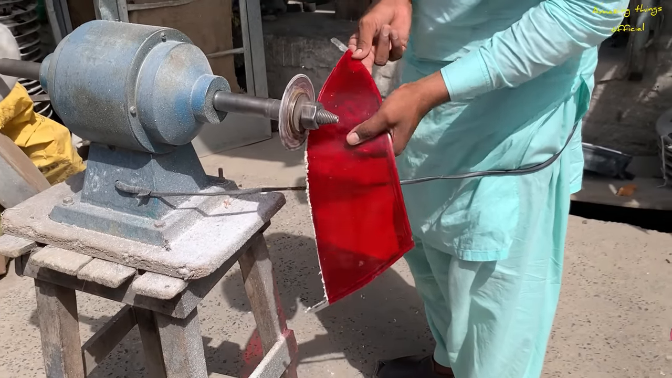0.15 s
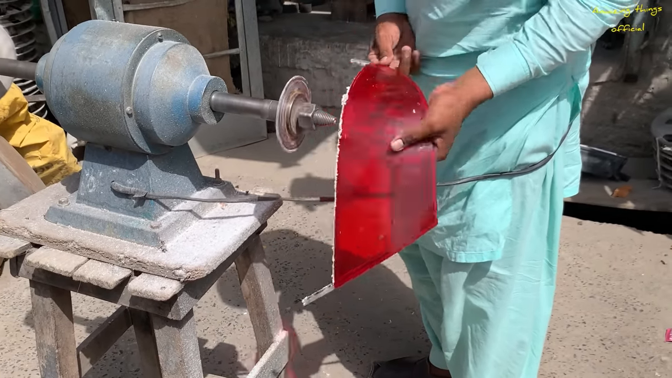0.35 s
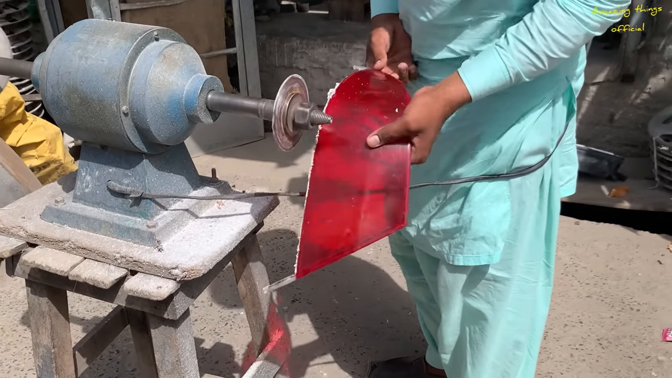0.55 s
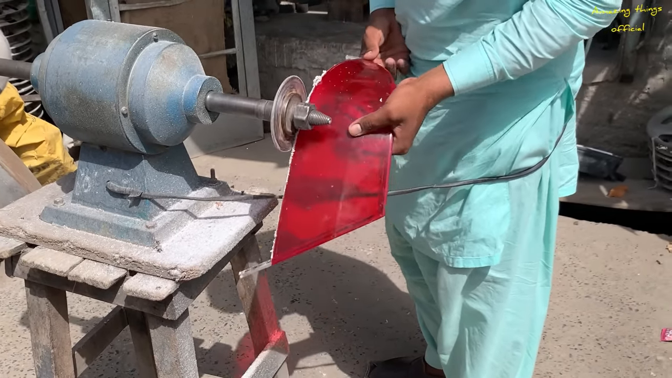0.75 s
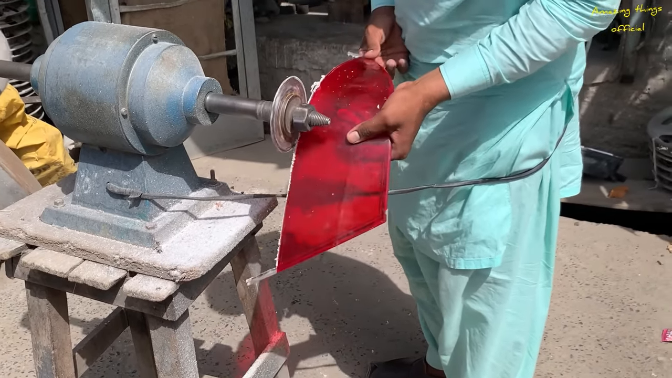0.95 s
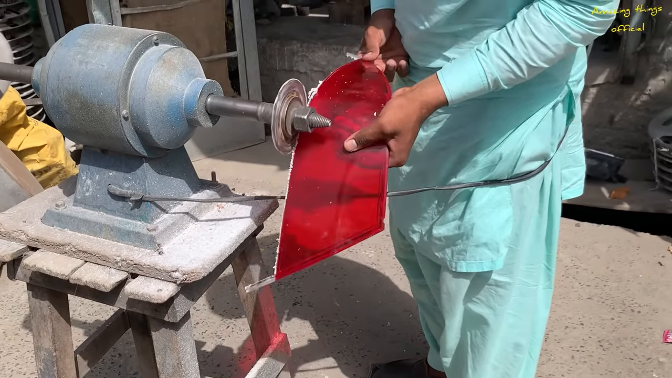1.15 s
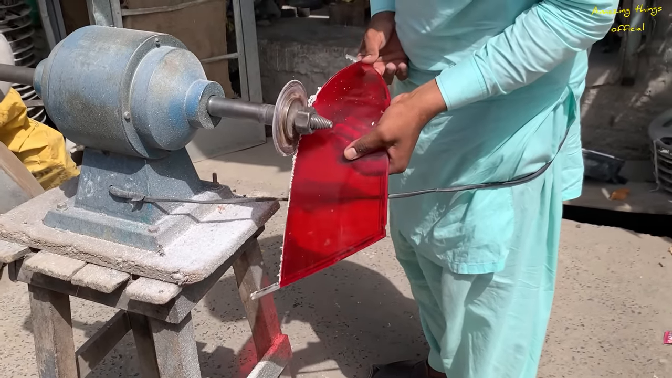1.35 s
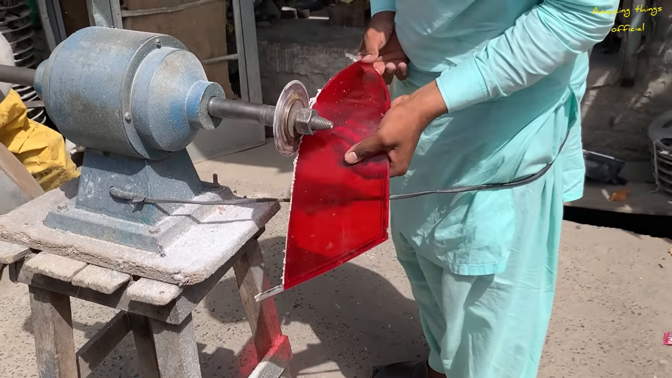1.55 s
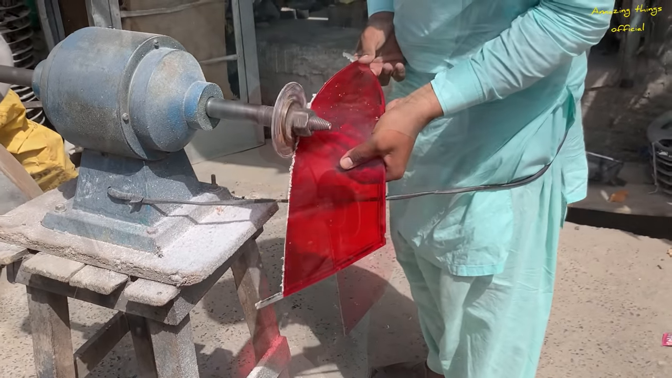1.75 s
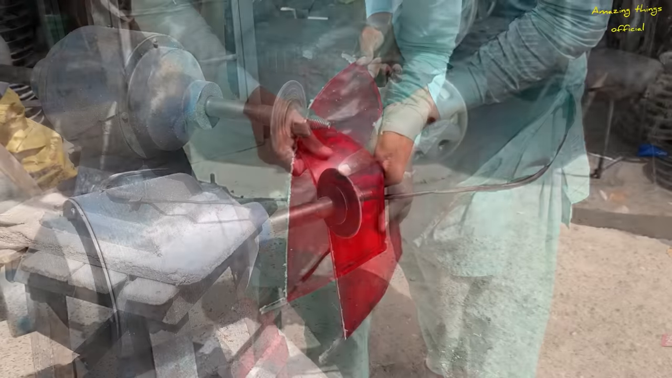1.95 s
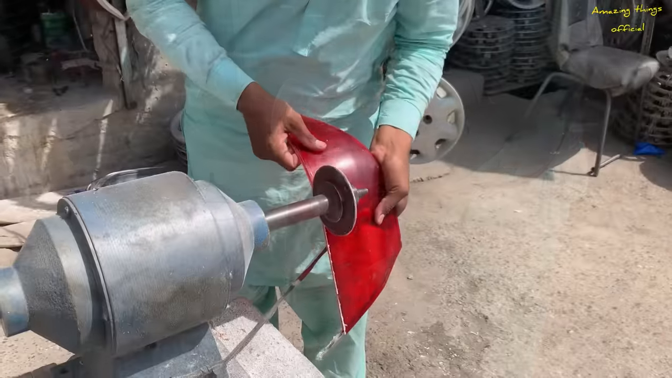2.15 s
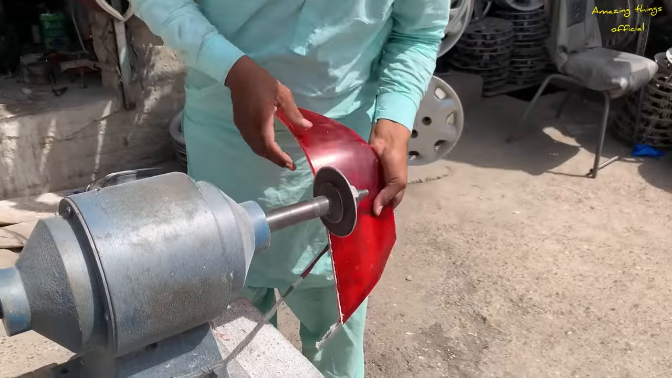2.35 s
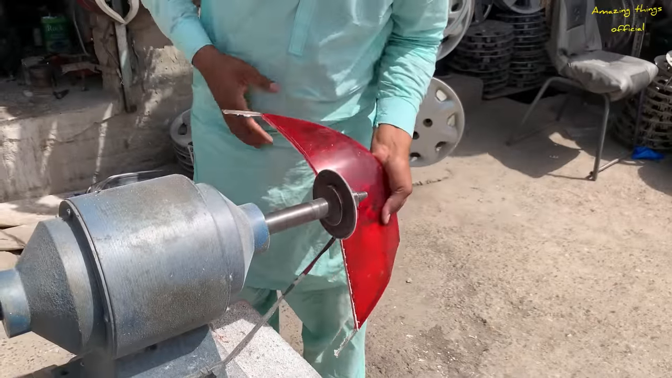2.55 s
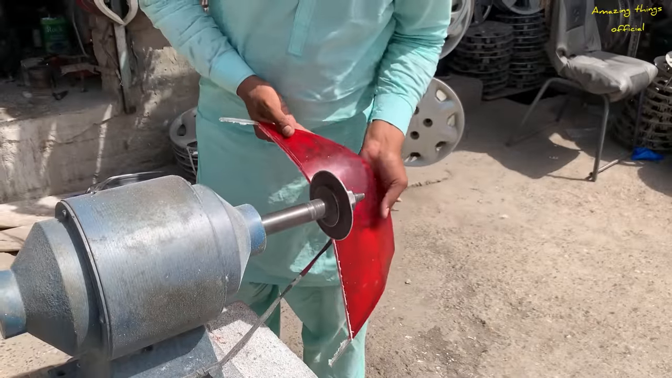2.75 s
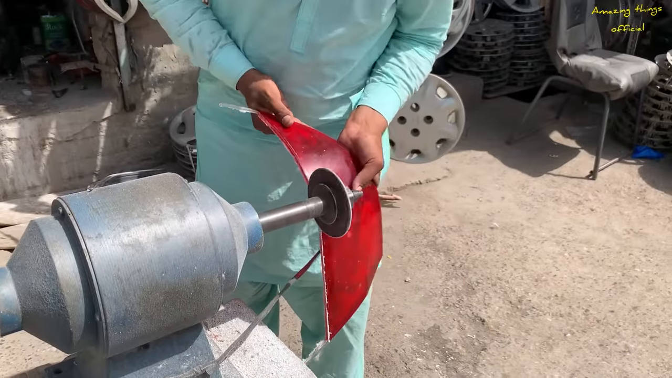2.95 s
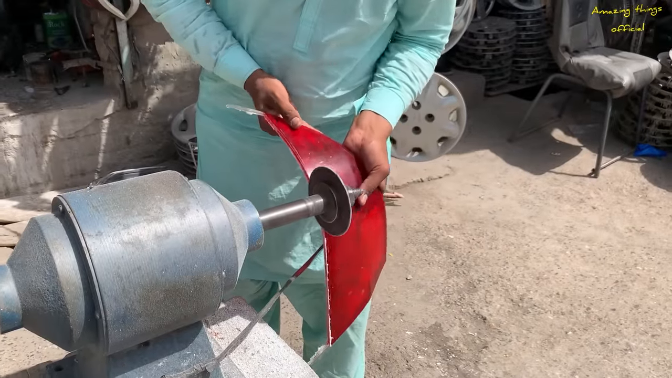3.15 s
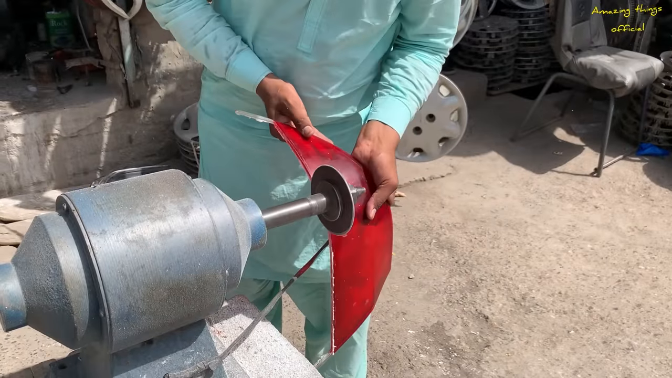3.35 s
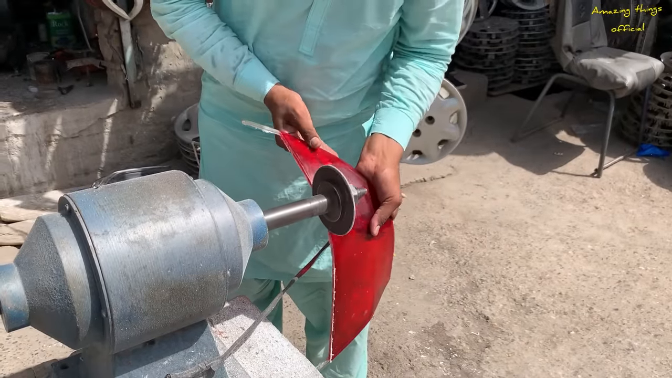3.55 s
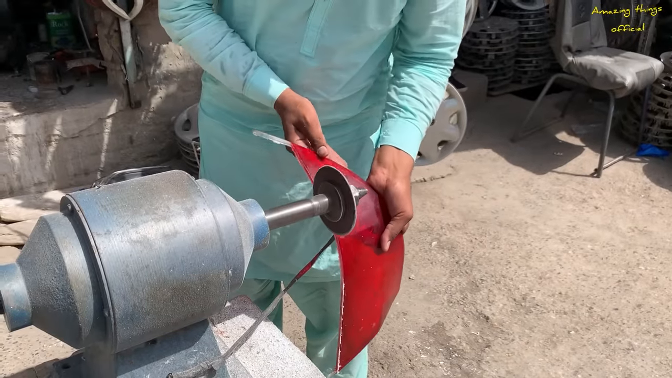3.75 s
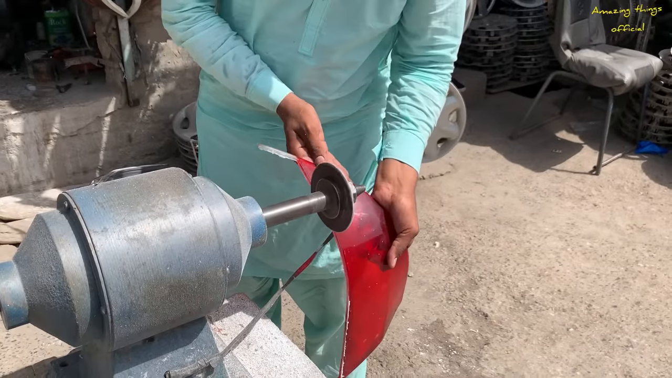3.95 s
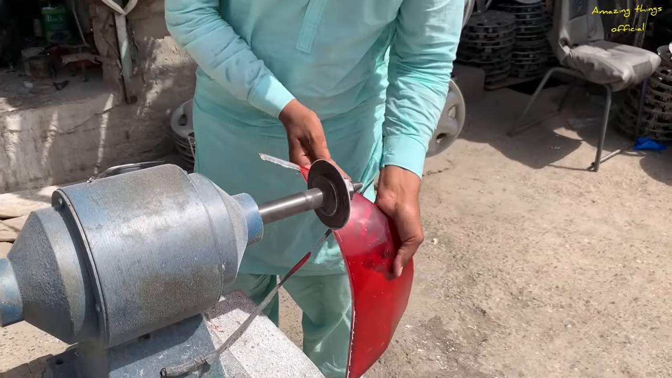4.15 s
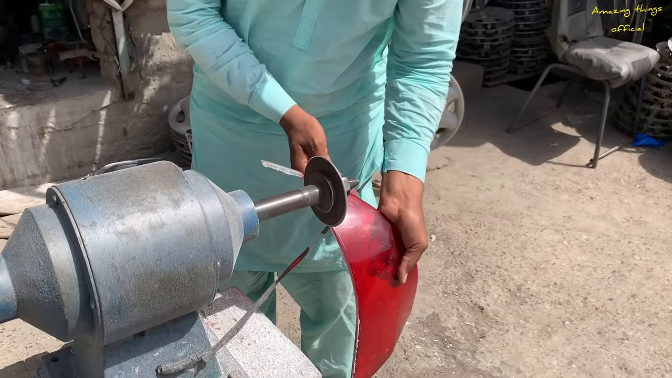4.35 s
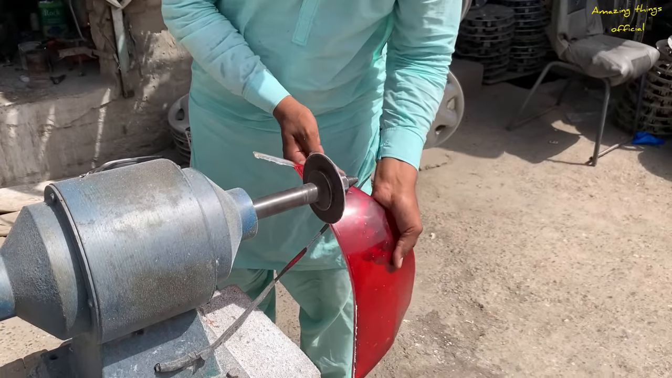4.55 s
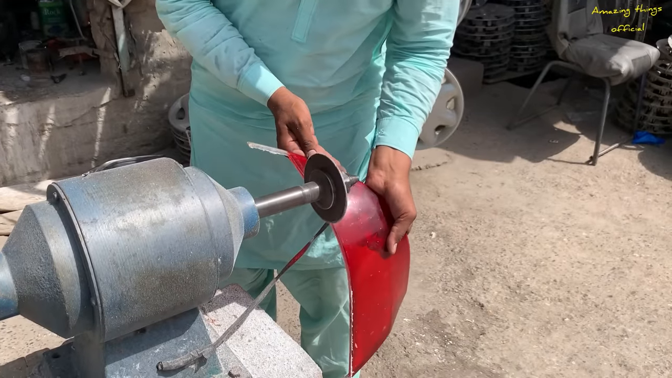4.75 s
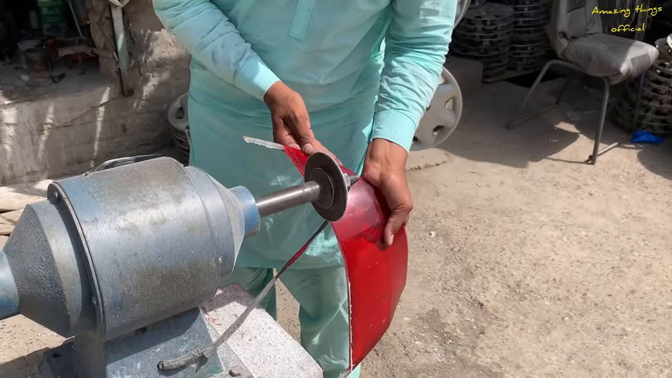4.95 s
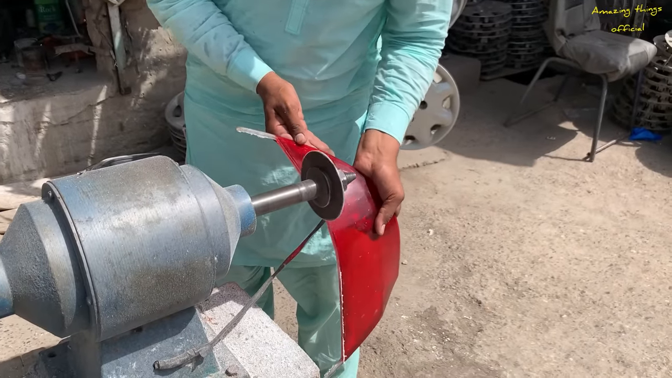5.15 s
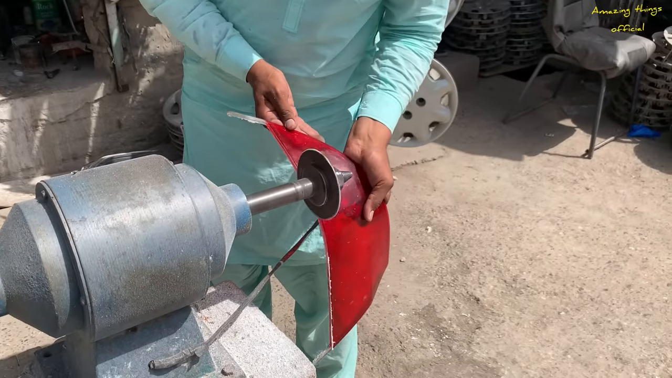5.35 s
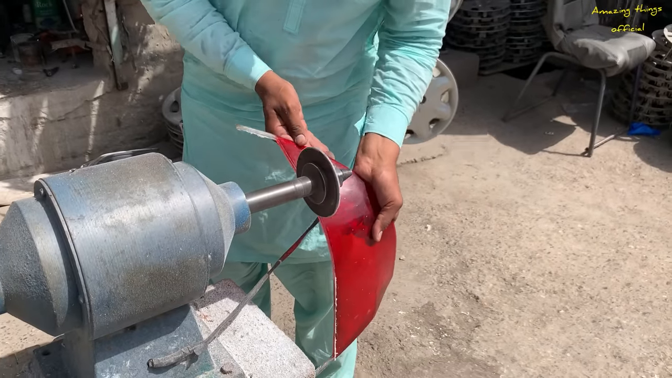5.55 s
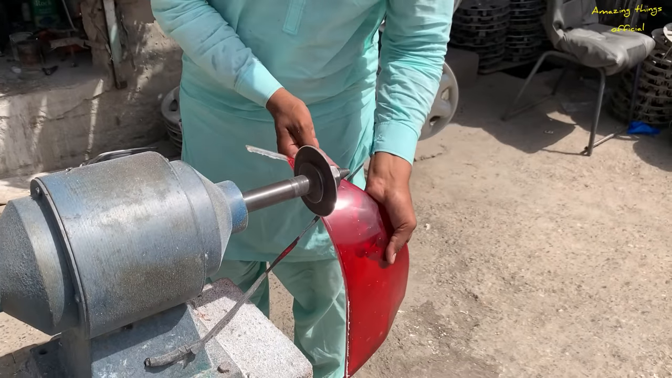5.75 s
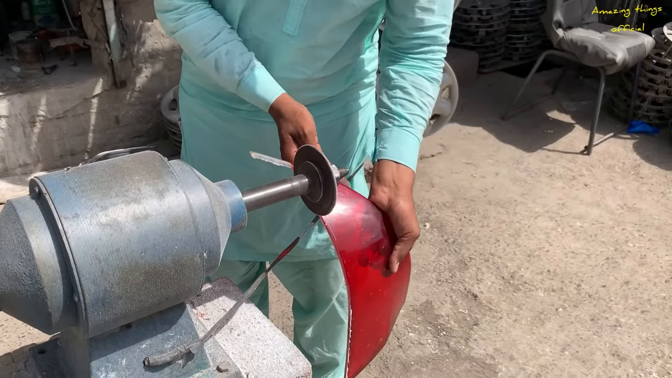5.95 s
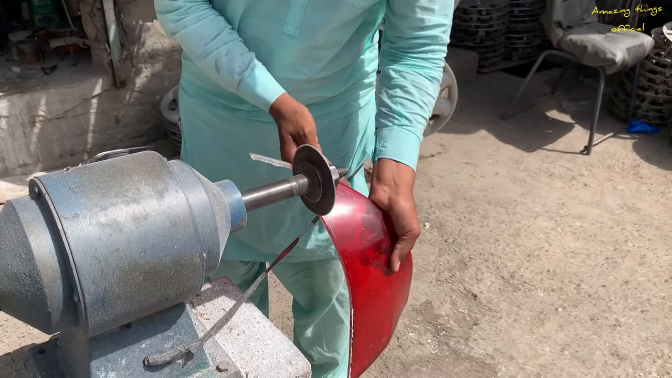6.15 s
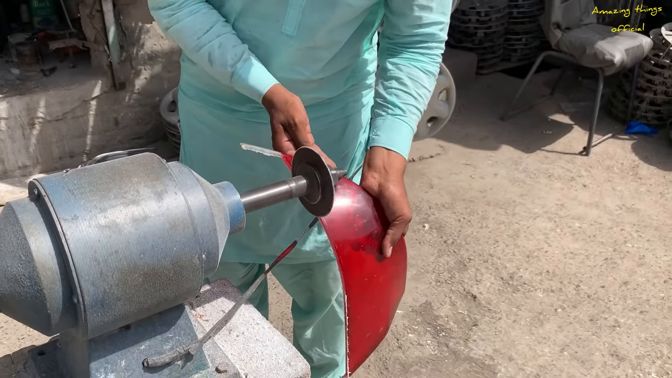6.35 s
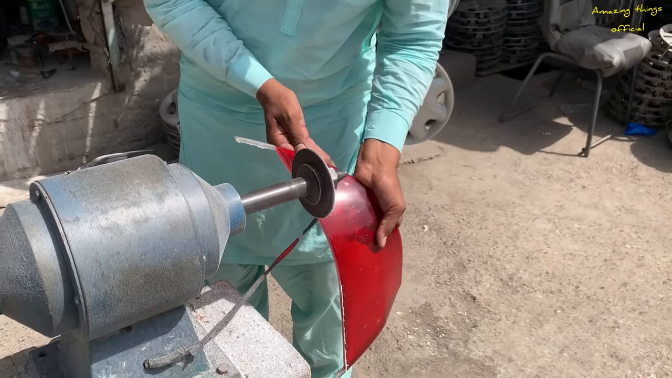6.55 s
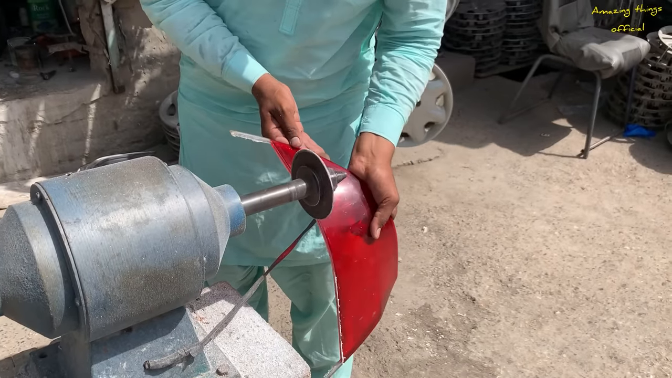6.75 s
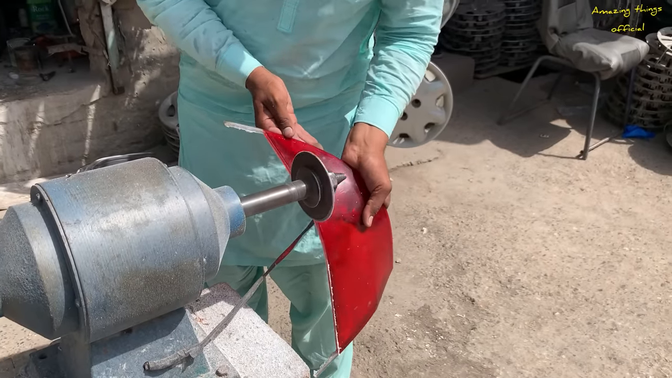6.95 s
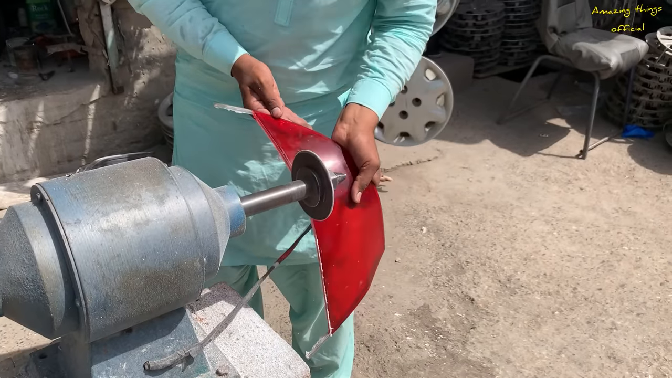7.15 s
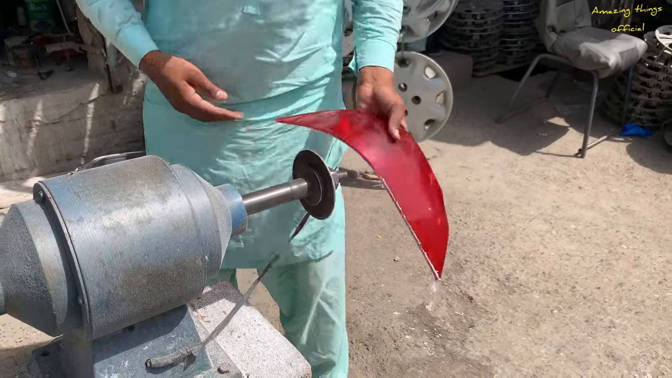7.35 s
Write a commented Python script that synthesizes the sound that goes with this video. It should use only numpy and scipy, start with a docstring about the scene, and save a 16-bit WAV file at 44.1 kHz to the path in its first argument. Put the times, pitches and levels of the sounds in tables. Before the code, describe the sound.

Three rasping cuts of plastic on a spinning abrasive disc, heard close up outdoors in stereo. The first is a short tail, the second a nasal buzz with light knocks, the third long, with hard knocks, thin shrill scrapes and bright spurts of chips. Between them are motor hum and airy bearing hiss, brighter after the second cut. Vehicle engines glide and rumble behind, strongest early.

```python
"""A buzzing rasp over engine drone: a curved plastic lens is already on the disc of a bench grinder.
It is pressed to the disc three times. Part of the grit pattern comes back each turn, so filtered noise
buzzes at shaft speed and rings the lens resonances; slaps, knocks, chips and rim shrills join in.
Between cuts the bearings hiss (coloured noise) over motor hum (sines). In the lane outside, gliding
harmonic engine notes fade over swelling noise. A phone listens from close by in the open yard."""
import sys
import numpy as np
from scipy import signal
from scipy.fft import rfft, irfft
from scipy.io import wavfile
from scipy.ndimage import uniform_filter1d, map_coordinates

SR = 44100
rng = np.random.default_rng(int(sys.argv[2]) if len(sys.argv) > 2 else 0)


def generate_wav(sig):
    """Save sig (samples, or channels by samples) to the path in sys.argv[1] as 16-bit PCM at SR."""
    pcm = np.round(np.clip(np.atleast_2d(sig).T, -1, 1) * 32767).astype(np.int16)
    wavfile.write(sys.argv[1], SR, pcm)


N = 326340
T = np.arange(N) / SR
FREQ = np.maximum(np.arange(N // 2 + 1) * SR / N, 1)
# place of the phone: 0 on the far side, 1 beside the housing
BESIDE = np.clip((T - 1.8) / .4, 0, 1)


def undb(db):
    """Decibels to gain."""
    return 10 ** (np.asarray(db) / 20)


def unit(x):
    """Scale so that the middle of the channels has rms 1."""
    return x / np.std(np.atleast_2d(x).mean(axis=0))


def curve(rows, axis=1):
    """One column of a table, joined by straight lines in time."""
    rows = np.array(rows)
    return np.interp(T, rows[:, 0], rows[:, axis])


def during(start, end, fade_s):
    """1 from start to end, fading to 0 outside."""
    return np.clip(1 + np.minimum(T - start, end - T) / fade_s, 0, 1)


def swell(middle, half_s, t=T):
    """A bell-shaped rise and fall with top 1."""
    return np.exp(-np.minimum(((t - middle) / half_s) ** 2, 20))


def over_freq(rows, axis=1):
    """One column of a table, joined on a log-frequency axis."""
    rows = np.array(rows)
    return np.interp(np.log(FREQ), np.log(rows[:, 0]), rows[:, axis])


def lift(freq, hz, width, db):
    """The bump in dB that one resonance adds."""
    return db / (1 + (2 * (freq - hz) / width) ** 2)


def colour(points, modes=(), freq=FREQ):
    """Gain per frequency: a smooth slope lifted by resonances."""
    hz, db = np.transpose(points)
    slope_db = np.interp(np.log(freq), np.log(hz), db)
    return undb(slope_db + sum(lift(freq, *mode) for mode in modes))


def shape(x, gain):
    """Filter by a gain per frequency."""
    return irfft(rfft(x) * gain, N)


def steady(x, window_s=0.1):
    """Hold the running rms of the middle of the channels at 1."""
    return x / np.sqrt(uniform_filter1d(x.mean(axis=0) ** 2, int(window_s * SR)) + 1e-18)


def walk(rate):
    """Random levels held 1 / rate s and slewed twice; spread 1."""
    hold = int(SR / rate)
    steps = np.repeat(rng.standard_normal(N // hold + 1), hold)
    return unit(uniform_filter1d(uniform_filter1d(steps, hold), hold)[:N])


def patches(grid):
    """A random field over frequency and time, smooth in both; spread 1."""
    field = rng.standard_normal(grid)
    for _ in range(2):
        field = uniform_filter1d(uniform_filter1d(field, size=4, axis=0), size=14, axis=1)
    return field / np.std(field)


def wide_noise(gain, width_hz):
    """Coloured stereo noise, alike left and right in the bass and unrelated above width_hz."""
    mid, side = rng.standard_normal((2, N))
    side = shape(side, np.minimum(FREQ / width_hz, 1) ** 0.7)
    return unit(shape(mid + np.array([side, -side]), gain))


# the grinder at the two microphone ports, from the far side and from beside the housing:
# (freq_hz, left_lead_rad, left_minus_right_db, scattered_share 0-1)
FAR_SIDE_PORTS = [(200, .1, -2, .04), (500, .4, 0, .1), (760, 1, 7, .12), (950, 0, .5, .08),
                  (1350, 1.2, 1, .08), (1750, 2.1, 1, .15), (1980, 2.6, 5, .2), (2400, .4, 0, .3),
                  (2720, -2.3, -3, .25), (3050, -.3, -3, .2), (3600, 1.1, 1, .2), (3850, -.9, 0, .2),
                  (4400, .2, -1.5, .2), (4950, .8, -1.5, .2), (5400, 2.5, -4, .2), (6900, 2.7, 1, .15),
                  (9200, 0, 0, .07), (11700, -3.14, 0, .01), (14000, -6.28, 0, .1), (15600, -8.4, 0, .2)]
BESIDE_PORTS = [(200, .1, -2, .04), (700, .5, 2.5, .12), (950, .5, 2, .08), (1130, 1.2, 4, .1),
                (1450, 1.2, 10, .15), (1700, 1.5, 7, .35), (2000, 2.3, -3, .22), (2170, 2.9, -1.5, .2),
                (2450, .9, 0, .22), (2750, 1.6, -1, .2), (3020, 2.5, -4, .27), (3250, .6, -1, .25),
                (3500, .5, 2.5, .18), (4050, .7, -3, .3), (4500, 0, -1, .25), (5600, 2, -6, .4),
                (6200, .8, -2.5, .45), (6800, 1.7, 1, .25), (7600, 2.2, 0, .15), (9200, 0, 0, .1),
                (11700, -3.14, 0, .01), (14000, -6.28, 0, .1), (15600, -8.4, 0, .2)]
SCATTER_S = .014  # decay time of the scatter


def ports(rows):
    """Path to each port: the direct sound plus scatter from motor, bench, ground and walls."""
    lead, pan_db, share = (over_freq(rows, axis=k) for k in range(1, 4))
    sign = np.array([[1], [-1]])  # left, right
    echoes = rng.standard_normal((2, N)) * (T / SCATTER_S) ** .5 * np.exp(-T / SCATTER_S)
    echoes = rfft(echoes / np.linalg.norm(echoes, axis=1, keepdims=True))
    direct = np.exp(.5j * sign * lead)
    balance = undb(sign * pan_db / 2) / np.sqrt(np.cosh(pan_db * np.log(10) / 20))
    return balance * (np.sqrt(1 - share) * direct + np.sqrt(share) * echoes)


def hear(x, gain, paths):
    """Colour a sound and carry it to the ports, first from the far side, then from beside the housing."""
    far, near = shape(x, gain * paths)
    return far + BESIDE * (near - far)


# notes from the lane, mostly engines: (start_s, end_s, first_pitch_hz, last_pitch_hz, level_db before trim)
ENGINE_NOTES = [(0.03, 0.198, 72, 83.5, -30.5), (0.13, 0.5, 123, 131, -27),
                (0.291, 1.024, 104, 111.8, -30.5), (1.104, 1.325, 98.4, 94.8, -33),
                (0.17, 0.33, 280, 270, -33.5), (0.017, 0.422, 243, 232, -37.5),
                (0.06, 0.085, 580, 560, -37), (.815, 0.835, 615, 598, -36), (1.2, 1.55, 250, 246, -42.5),
                (2.8, 3.15, 262, 271, -47.5), (2.8, 2.81, 360, 390, -41), (2.92, 2.98, 420, 395, -42.5),
                (0.419, 0.86, 246, 252, -38), (0.96, 1.28, 59, 61.6, -31.5), (1.368, 1.35, 61.6, 62, -24),
                (1.53, 1.84, 66.1, 68.3, -30.5), (2.04, 2.14, 74.6, 83.2, -30.5),
                (2.85, 3.19, 70, 65.4, -33.5), (2.817, 3.087, 160.9, 168.2, -36.5),
                (3.3, 4.04, 169, 175.8, -43), (3.15, 3.89, 134.3, 137.5, -44.5)]
DRONE_FADE_S = .055
OVERTONE_DB, OVERTONE_DB_PER_OCTAVE = -17, -6.5  # level at the second harmonic, slope above it


def exhaust(waver=0.0052, rough_db=1.5, lag_s=0.00035, count=6):
    """Gliding engine notes with weak overtones; they reach the left port first."""
    out = np.zeros((2, N))
    wobble, throb = 1 + waver * walk(24.35), undb(rough_db * walk(30.2))
    for start, end, first_hz, last_hz, db in ENGINE_NOTES:
        gain = np.sqrt(2) * during(start, end, DRONE_FADE_S) * undb(db) * throb
        on = gain > 0
        hz = np.interp(T[on], [start, end], [first_hz, last_hz]) * wobble[on]
        lag_turns = hz * np.array([[0], [lag_s]])
        phase = 2 * np.pi * (rng.random() + np.cumsum(hz) / SR - lag_turns)
        note = np.sin(phase)
        for k in range(2, count + 1):
            overtone = undb(OVERTONE_DB + OVERTONE_DB_PER_OCTAVE * np.log2(k / 2))
            note = note + overtone * np.sin(k * phase + 2 * np.pi * rng.random())
        out[:, on] += gain[on] * note
    return out


# colour of the traffic's low rumble and of its roar: (freq_hz, relative_level_db per Hz)
RUMBLE_COLOUR = [(20, -28), (35, -1), (55, 10), (90, 7.5), (130, 12), (180, -1.5), (300, -40)]
ROAR_COLOUR = [(120, -3.5), (190, 6), (260, 4.5), (380, -1), (600, -6.5), (1000, -11), (2000, -32.5)]
# vehicles swell and fade over the distant traffic:
# (nearest_s, half_length_s, rumble_level_db, roar_level_db), both before trim
VEHICLE_PASSES = [(0.297, 0.99, -28.5, -38.5), (1.75, 0.7, -34, -58), (2.863, 0.31, -34.5, -37),
                  (3.75, 0.16, -41, -46)]
TRAFFIC_RUMBLE_DB, TRAFFIC_ROAR_DB = -41.5, -49  # distant traffic, before trim


def traffic_level(column, far_db):
    """Distant traffic and passing vehicles, added as powers."""
    passing = sum(undb(row[column]) ** 2 * swell(*row[:2]) for row in VEHICLE_PASSES)
    return np.sqrt(undb(far_db) ** 2 + passing)


def lane(rumble_db=-4.0, roar_db=-2, drone_db=-1.5):
    """Traffic outside: exhaust notes over rumble and roar noise that swells as each vehicle passes."""
    rumble = traffic_level(2, TRAFFIC_RUMBLE_DB) * undb(rumble_db)
    roar = traffic_level(3, TRAFFIC_ROAR_DB) * undb(roar_db)
    out = wide_noise(colour(RUMBLE_COLOUR), width_hz=970) * rumble
    out = out + wide_noise(colour(ROAR_COLOUR), width_hz=560) * roar
    return out + exhaust() * undb(drone_db)


# colour of the free-running grinder: (freq_hz, relative_level_db per Hz)
IDLE_COLOUR = [(60, 4), (130, -3.5), (300, -1), (600, -8), (1200, -8), (1850, -11.5), (2500, -11),
               (3100, -10.5), (3700, -10), (5500, -10.5), (7500, -11), (10000, -11), (12000, -22),
               (15500, -21)]
# level of its air hiss: (time_s, level_db before trim)
HISS_LEVEL = [(2.9, -35), (7.3, -37)]
# resonances of the housing (heard from the far side) and of the bearings (from beside it):
# (freq_hz, width_hz, lift_db)
HOUSING_MODES = [(1850, 400, 3.5), (2550, 310, 3.5), (4300, 700, -1), (4750, 200, 0), (6350, 770, 9),
                 (7500, 900, -3), (8550, 300, 4), (9900, 220, 8)]
BEARING_MODES = [(2120, 160, 11), (2570, 390, 10), (4660, 160, 4), (5100, 450, 7), (6240, 450, 9.5),
                 (7850, 800, -1.5), (9100, 150, 4), (10600, 180, 0), (10270, 240, 14)]
# motor hum lines: (pitch_hz, level_db rms, around which each wavers)
HUM_LINES = [(49.3, -52), (100, -52.5), (148, -60.5), (247, -54), (296, -59.5), (394, -58.5),
             (443.5, -60.5), (493, -57.5)]


def motor(paths, hiss_db=-3.5, far_side_db=-4, shadow_hz=8000, loaded_db=-5, diffuse_db=-10):
    """Fan air hisses over the hum, dull from the far side; beside the housing the bearings ring out."""
    far_gain = colour(IDLE_COLOUR, HOUSING_MODES) / np.hypot(1, FREQ / shadow_hz)
    near_gain = colour(IDLE_COLOUR, BEARING_MODES)
    hisses = []
    for gain, path in zip((far_gain, near_gain), paths):
        straight = unit(shape(rng.standard_normal(N), gain * path))
        thrown_back = undb(diffuse_db) * wide_noise(gain, width_hz=1200)  # by the yard
        hisses.append(straight + thrown_back)
    far, near = hisses
    # side load takes up the play of the bearings and quiets them
    load = sum(during(start, end, fade_s=0.03) for start, end, *_ in LENS_CUTS)
    near = near * undb(loaded_db * load)
    air = np.sqrt(BESIDE) * near + np.sqrt(1 - BESIDE) * undb(far_side_db) * far
    hum = 0
    for hz, db in HUM_LINES:
        level = np.sqrt(2) * undb(db + 0.77 * walk(4.86))
        hum = hum + level * np.sin(2 * np.pi * (hz * T + rng.random()))
    return air * undb(curve(HISS_LEVEL) + hiss_db) + hum


# level of the bearing whine: (time_s, level_db rms)
WHINE_LEVEL = [(1.8, -70), (2.25, -54), (2.9, -44), (3.3, -51), (7.1, -49.5), (7.25, -51)]
WHINE_HZ, WHINE_WIDTH_HZ = 5094, 87


def whine(path):
    """One bearing sings as noise in a narrow band, loudest while the disc runs free."""
    ring = 1 / (1 + 2j * (FREQ - WHINE_HZ) / WHINE_WIDTH_HZ) ** 2
    return unit(shape(rng.standard_normal(N), ring * path)) * undb(curve(WHINE_LEVEL))


# the shaft barely slows while the lens cuts: (time_s, speed_turns_per_s before jitter)
SHAFT_SPEED = [(0, 49.4), (.6, 49.4), (1.1, 49.08), (2, 49.05), (2.8, 49.3), (3.7, 49.2), (4.3, 49.35),
               (5.1, 49.24), (6.2, 49.27), (6.8, 49.18), (7.4, 49.3)]


def shaft_turns():
    """Turns of the shaft so far, with a slight random jitter of speed."""
    return np.cumsum(curve(SHAFT_SPEED) * (1 + 0.000364 * walk(12))) / SR


def disc_face(turns, kept, spread_db, size):
    """Grains round the disc, read as it spins; each turn keeps a share of the pattern and renews the rest."""
    kept = np.clip(kept, 0, .98)
    grid = (int(turns[-1]) + 2, size)
    grain_db = spread_db * np.minimum(rng.exponential(size=grid), 3.5)
    fresh = rng.standard_normal(grid) * undb(grain_db)
    fresh[0] /= np.sqrt(1 - kept ** 2)  # the first turn is as strong as the later ones
    face = signal.lfilter([1], [1, -kept], fresh, axis=0).ravel()
    return unit(map_coordinates(face, [turns * size], order=3, mode="nearest"))


# chips fly off: (peak_s, level_db)
CHIP_SPURTS = [(.748, -35), (1.63, -38), (1.7, -35), (2.955, -27), (3.635, -27), (5.58, -37), (5.8, -35)]
# colour of the chips: (freq_hz, relative_level_db per Hz)
CHIP_COLOUR = [(3000, -22), (6000, -14), (8500, 3), (13000, 6), (15500, -6)]


def spits(paths, rise_s=.016, decay_s=0.026):
    """Chips tear off the edge in short bright spurts of noise."""
    level = 0
    for s, db in CHIP_SPURTS:
        rise = swell(s, rise_s, np.minimum(T, s))
        level = level + undb(db) * rise * np.exp(-np.clip((T - s) / decay_s, 0, 20))
    return unit(hear(rng.standard_normal(N), colour(CHIP_COLOUR), paths)) * level


# the thin rim shrills: (middle_s, half_length_s, level_db before trim)
RIM_SHRILLS = [(3.053, 0.015, -31), (3.2, 0.092, -26), (3.403, 0.13, -30.5)]


def rim(turns, path, hz=8420, width_hz=420, trim_db=-3):
    """A narrow high resonance of the rim, scraped by grit that comes round with the shaft."""
    ring = 1 / (1 + 2j * (FREQ - hz) / width_hz) ** 2
    scrape = unit(shape(disc_face(turns, kept=.4, spread_db=1.5, size=896), ring * path))
    return scrape * sum(undb(db + trim_db) * swell(s, half) for s, half, db in RIM_SHRILLS)


# the lens jumps and knocks on the disc: (start_s, level_db before trim, pitch_hz)
LENS_KNOCKS = [(.972, -16.5, 1270), (1.043, -16.5, 820), (1.138, -18, 774), (1.245, -24, 840),
               (1.62, -21.5, 830), (1.702, -20, 760), (1.774, -25, 900), (2.296, -18.5, 1110),
               (3.205, -21, 360), (3.581, -19, 1160), (3.665, -13, 1053), (3.741, -13, 1080),
               (3.783, -14.5, 1130), (3.805, -19, 1040), (4.523, -19.5, 1050), (6.327, -23, 1150)]


def knocks(paths, trim_db=-2, rise_s=0.0097, decay_s=0.012, q=2.0):
    """Each jump is a short hard bite of noise that rings the bending mode nearest the point of contact."""
    out, grit = np.zeros(N), rfft(rng.standard_normal(N))
    for s, db, hz in LENS_KNOCKS:
        on = (T > s) & (T < s + .5)
        age = T[on] - s
        blow = undb(db + trim_db) * (1 - np.exp(-age / rise_s)) * np.exp(-np.minimum(age / decay_s, 20))
        ring = 1 / (1 + 1j * q * (FREQ / hz - hz / FREQ)) ** 2
        out[on] += blow * unit(irfft(grit * ring, N))[on]
    return hear(out, 0.94, paths)


# the lens flutters on the high spot of the disc: (middle_s, half_length_s, pitch_hz, level_db)
HIGH_SPOT_SLAPS = [(.16, 0.054, 1360, -36), (.93, .08, 1290, -39), (1.261, .1, 1920, -37),
                   (4.71, 0.23, 3496, -33), (5.18, 0.046, 3620, -33), (5.488, 0.063, 1300, -39),
                   (6.134, 0.05, 3420, -31.5), (6.113, 0.059, 2434, -31), (6.567, 0.04, 3400, -39)]
HIGH_SPOT_TURNS = .1


def slaps(turns, paths, q=4.2, scatter_db=1.2):
    """Held loosely, the lens meets only the high spot: one short scrape per turn rings one resonance."""
    high_spot = np.exp(-((turns % 1 - .5) / HIGH_SPOT_TURNS) ** 2)
    touch = unit(disc_face(turns, kept=0.79, spread_db=0.5, size=896) * high_spot)
    touch = rfft(touch * undb(scatter_db * walk(40)))
    out = 0
    for s, half, hz, db in HIGH_SPOT_SLAPS:
        ring = 1 / (1 + 1j * q * (FREQ / hz - hz / FREQ)) ** 2
        out = out + unit(irfft(touch * ring, N)) * undb(db) * swell(s, half)
    return hear(out, 0.88, paths)


# a fresh edge meets the disc and throws bright dust until it is blunt: (start_s, sharpness 0-1)
EDGE_STROKES = [(0.768, 0.84), (1.9, 0.03), (2.94, 0.55), (3.63, 0.36), (4.95, 0.24), (5.3, 0.14),
                (6.9, 0.37)]
BLUNT_S = 0.54  # time an edge lasts
ATTACK_S = 0.041  # the lens settles on the disc


def freshness():
    """Sharpness of the edge: renewed at a stroke, then worn away."""
    return sum(sharp * np.clip(1 + (T - s) / ATTACK_S, 0, 1) * swell(s, BLUNT_S)
               for s, sharp in EDGE_STROKES)


# the lens on the disc: (start_s, end_s, first_rasp_level_db before zone trim, easing_db_per_s of the hand,
# release_s, then flexing_db, ringing_db and dust_db relative to the rasp)
LENS_CUTS = [(-0.1, 0.191, -27.5, 6.9, 0.019, -15.5, -0.5, -8),
             (0.766, 2.197, -31, 4.16, 0.083, -10.5, -2.5, -3.5),
             (2.937, 7.158, -28, 2.52, 0.022, -16, -6, -5)]
# the hand leans harder: (middle_s, half_length_s, extra_pressure_db)
HAND_PUSHES = [(0.183, 0.04, 2), (2.057, 0.083, 6.5), (3.129, 0.021, 3.5), (3.223, 0.035, 3.5),
               (3.62, 0.045, 3), (4.098, 0.15, 2), (4.65, 0.11, 2.7), (6.15, 0.075, 2.5), (6.346, 0.032, 2),
               (6.4, 0.25, 8.5), (6.843, 0.093, 1.5), (6.993, 0.36, 8)]
# the lens chatters and its low modes swell or sink: (middle_s, half_length_s, flexing_db, ringing_db)
LENS_CHATTERS = [(1.35, 0.36, 1.5, 6.5), (2.083, 0.041, -8, 4.5), (2.32, 0.056, 7, 11),
                 (3.774, 0.051, 10.5, 7), (4.056, 0.04, 8, 3), (4.382, 0.031, 7.5, 6), (4.53, 0.11, 9, 5),
                 (4.677, 0.08, 0.5, 1.5), (5.48, 0.04, -6, 5.5), (5.775, 0.029, 13, 7),
                 (6.215, 0.038, 6.5, 3), (6.375, 0.033, 3, -3), (6.416, 0.47, 12, 8.5),
                 (6.85, 0.43, 1, -2.5)]
FRESH_DUST_DB = 9  # extra dust at sharpness 1


def zone_gains():
    """All four zones follow the hand's pressure; chatter moves the low two, a fresh edge lifts the dust."""
    push_db = sum(db * swell(s, half) for s, half, db in HAND_PUSHES)
    flex_db, ring_db = (sum(row[k] * swell(*row[:2]) for row in LENS_CHATTERS) for k in (2, 3))
    zones = 0
    for start, end, db, easing, release_s, *balance_db in LENS_CUTS:
        contact = np.clip(.5 + (T - start) / ATTACK_S, 0, 1)
        contact = contact * np.exp(-np.clip((T - end) / release_s, 0, 20))
        pressure = contact * undb(db - easing * np.clip(T - start, 0, end - start) + push_db)
        zones = zones + np.outer(undb([0, *balance_db]), pressure)
    rasp, flex, ring, dust = zones
    return rasp, flex * undb(flex_db), ring * undb(ring_db), dust * undb(FRESH_DUST_DB * freshness())


# colour of the scraping itself: (freq_hz, relative_level_db)
SCRAPE_COLOUR = [(280, 7.5), (600, 2.5), (1200, 11.5), (1700, 1), (2200, 2.5), (2800, 7), (3400, 4.5),
                 (4500, 3), (5400, -7), (7500, -8.5), (10000, -10.5), (13000, -14), (15500, -17)]
# fixed lens resonances when its long edge or its curved end is ground: (freq_hz, width_hz, lift_db)
LONG_EDGE_MODES = [(550, 150, -4), (730, 170, 4), (969, 70, 4), (1180, 150, 2), (1370, 230, 9),
                   (1560, 110, -6), (2720, 160, -3), (2920, 130, 4), (3450, 140, 3), (3870, 180, 3),
                   (4200, 400, 2), (4780, 250, 3), (5400, 600, 1), (9100, 1500, 4)]
CURVED_END_MODES = [(420, 200, 9), (700, 160, -3), (940, 120, 10), (1110, 100, 2), (1240, 100, 1.5),
                    (1390, 210, 8.5), (1550, 70, -3), (1630, 90, 1.5), (2160, 220, 4), (2470, 190, 2),
                    (3000, 190, -3.5), (3310, 160, 2.5), (1900, 130, 3), (2780, 140, 2.5), (3740, 300, 2),
                    (4600, 600, 4), (5400, 400, 3), (6120, 250, 0.5), (6500, 300, -3), (6820, 300, 3),
                    (8400, 500, 4), (10400, 900, 4), (11600, 600, -4), (12700, 900, 3)]
# reference pitch of the gliding resonances, along the long edge, then the curved end: (time_s, pitch_hz)
LONG_EDGE_BEND = [(.15, 3240), (0.8, 3400), (.95, 3310), (1.05, 3320), (1.25, 3230), (1.45, 3170),
                  (1.9, 3180)]
CURVED_END_BEND = [(2.97, 3520), (3.14, 3395), (3.27, 3550), (3.5, 3607), (3.8, 3620), (4.1, 3580),
                   (4.4, 3460), (4.9, 3400), (5.2, 3600), (5.8, 3500), (6.4, 3360), (6.85, 3650),
                   (7.14, 3560)]
# resonances and the dips between them that glide with it: (ratio to the reference pitch, width_hz,
# then lift before drift: free_edge_db, edge_under_thumb_db, curved_end_db)
GLIDING_MODES = [(.49, 201, -1, 3, 4.5), (0.601, 230, 16.5, 8.5, 2.5), (0.755, 220, 7.5, 2, 1.5),
                 (.89, 161, -5, -4, 1.5), (0.998, 636, 10, -0.5, 6.5), (1.3, 600, 1.5, -6.5, -3)]
BEND_WANDER_DB = 2.5  # each lift drifts by chance
# narrow bands of the rasp's colour that swell or sink for a moment:
# (middle_s, half_length_s, freq_hz, lift_db)
BAND_SWELLS = [(.1, .15, 2020, -14), (0.105, 0.13, 4080, 6), (.1, .15, 4650, 2), (.1, 0.16, 960, -15),
               (.1, .15, 1570, -7), (.1, .15, 2950, -1), (0.15, .06, 1710, 13), (0.833, 0.061, 3290, 9),
               (0.855, 0.068, 1230, -14), (.88, 0.15, 2740, -6), (1.037, .04, 2900, 16),
               (1.2, 0.33, 1950, 7), (2.045, 0.049, 4130, 22), (2.096, 0.039, 2000, 16),
               (2.156, 0.021, 2590, 14.5), (3.139, .04, 4240, 12), (3.294, 0.07, 3620, 8),
               (3.63, 0.026, 3880, 12), (3.653, 0.061, 4550, 11), (3.68, 0.16, 1960, 1.5),
               (4.2, 0.4, 2470, 3.5), (4.15, .2, 3550, 5), (4.37, 0.031, 4000, 9), (4.2, 0.21, 1610, 10),
               (4.303, 0.14, 2870, 7), (4.64, 0.17, 1440, 4), (4.9, 0.16, 497, 16), (5.2, 0.86, 1714, -11),
               (5.1, 0.42, 2660, -11), (5.325, 0.11, 2040, 19), (5.954, 0.14, 2800, 6),
               (6.365, 0.033, 970, -0.5), (6.554, 0.1, 2040, -0.5), (6.9, 0.25, 4600, 3.5),
               (6.9, 0.24, 3300, -4), (6.9, 0.23, 3950, 3.5), (6.924, 0.14, 2500, -4),
               (6.98, 0.21, 2750, -9), (7.1, 0.072, 1770, 1)]
BAND_WIDTH_HZ = 220
REGRIP_S = 2.6  # the hands turn from the long edge to the curved end
THUMB_START_S, THUMB_END_S = 1.37, 1.7  # the thumb flattens on the long edge
DULL_TILT_DB, FRESH_TILT_DB = 0.5, 15  # tilt above 8 kHz when dull, its rise when fresh, dB per octave


def lens_gain(freq, times):
    """Response of the held lens, frequency by time: grip, gliding resonances and many weak shell modes."""
    on_edge = times < REGRIP_S
    edge_gain = colour(SCRAPE_COLOUR, LONG_EDGE_MODES, freq)
    end_gain = colour(SCRAPE_COLOUR, CURVED_END_MODES, freq)
    gain = np.where(on_edge, edge_gain, end_gain)
    edge_hz = np.interp(times, *np.transpose(LONG_EDGE_BEND))
    end_hz = np.interp(times, *np.transpose(CURVED_END_BEND))
    bend_hz = np.where(on_edge, edge_hz, end_hz)
    tilt_db = DULL_TILT_DB + FRESH_TILT_DB * np.interp(times, T, freshness())
    db = tilt_db * np.log2(np.maximum(freq / 8000, 1))
    for ratio, width, free_db, thumb_db, end_db in GLIDING_MODES:
        edge_db = np.interp(times, [THUMB_START_S, THUMB_END_S], [free_db, thumb_db])
        drift_db = BEND_WANDER_DB * np.interp(times, T, walk(5.03))
        db = db + lift(freq, ratio * bend_hz, width, np.where(on_edge, edge_db, end_db) + drift_db)
    for s, half, hz, rise in BAND_SWELLS:
        db = db + lift(freq, hz, BAND_WIDTH_HZ, rise * swell(s, half, times))
    # the weak modes wax and wane as the contact point wanders over their nodes
    return gain * undb(db + 2.1 * patches(db.shape))


# zones of the cut, in the order rasp, flexing, ringing, dust:
# (low_hz, high_hz, share of the grit pattern kept per turn 0-1, trim_db)
CUT_ZONES = [(1670, 10300, 0.44, 0.39), (276, 1010, 0.86, 1.0), (1154, 2080, 0.8, -2.5),
             (5650, 18300, 0, 0.5)]


def grinding(turns, paths, lump_db=1.0, runout_db=0.46, tremble_db=1.0, sway=0.18, size=1024):
    """Grit scrapes the lens; high spots of the disc and the trembling hand vary the bite."""
    bite_db = lump_db * disc_face(turns, kept=0.83, spread_db=5.5, size=14)
    bite_db = bite_db + runout_db * np.cos(2 * np.pi * turns) + tremble_db * walk(35)
    bite = undb(bite_db)
    grit = np.array([disc_face(turns, kept, spread_db=1.21, size=896) * bite for _, _, kept, _ in CUT_ZONES])
    freq, times, frames = signal.stft(grit, SR, nperseg=size)
    response = lens_gain(np.maximum(freq, 1)[:, None], times)
    # as the lens tilts, each mode beams now towards one port, now towards the other
    beam = 1 + sway * np.multiply.outer([1, -1], patches(response.shape))
    rung = signal.istft(frames[:, None] * response * beam, SR, nperseg=size)[1][..., :N]
    out = 0
    for sound, gain, (low_hz, high_hz, _, trim_db) in zip(rung, zone_gains(), CUT_ZONES):
        band = 1 / np.sqrt((1 + (low_hz / FREQ) ** 16) * (1 + (FREQ / high_hz) ** 16))
        out = out + steady(hear(sound, band, paths)) * gain * undb(trim_db)
    return out


def scene():
    """The shaft turns the disc against the lens; the motor runs on and the lane lies behind."""
    turns = shaft_turns()
    paths = np.array([ports(FAR_SIDE_PORTS), ports(BESIDE_PORTS)])
    background = lane() + motor(paths) + whine(paths[1])
    accents = spits(paths) + rim(turns, paths[1]) + knocks(paths) + slaps(turns, paths)
    return background + accents + grinding(turns, paths)


TOP_HZ = 15650


def record(dry):
    """The phone thins the deep bass and cuts the top."""
    dry = signal.sosfilt(signal.butter(2, 36, "high", fs=SR, output="sos"), dry)
    return signal.sosfilt(signal.ellip(10, .2, 80, TOP_HZ, fs=SR, output="sos"), dry)


dry = scene()
out = record(dry)
generate_wav(out)
```